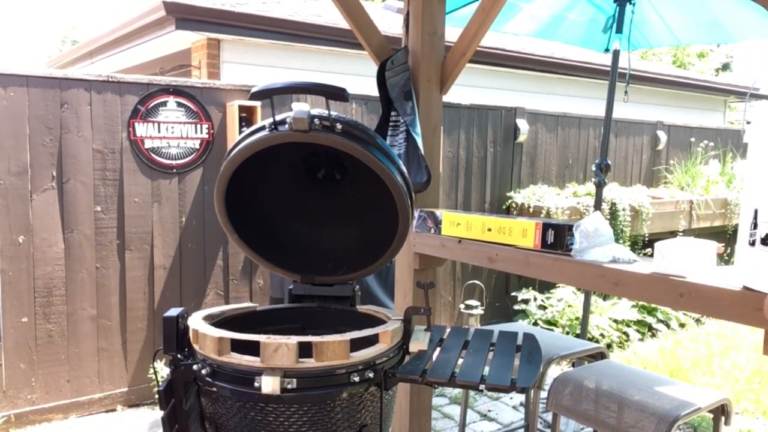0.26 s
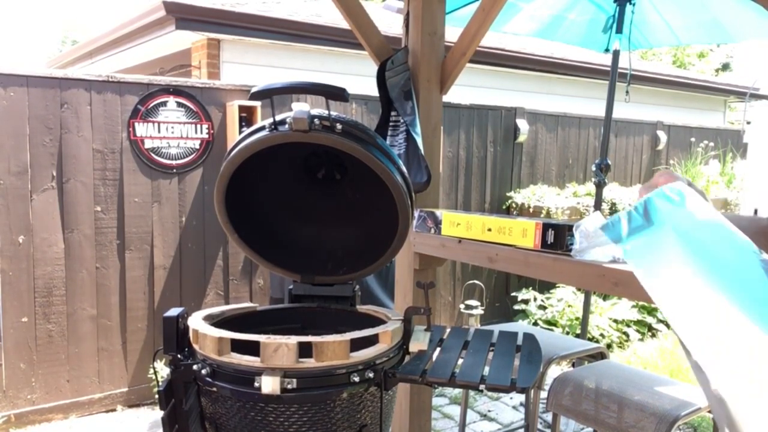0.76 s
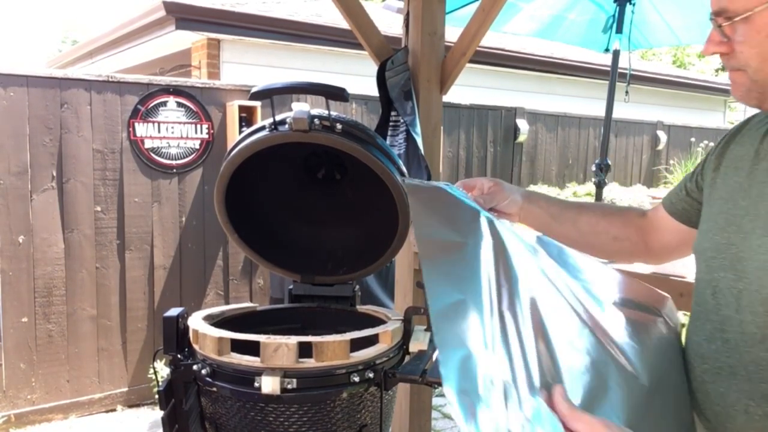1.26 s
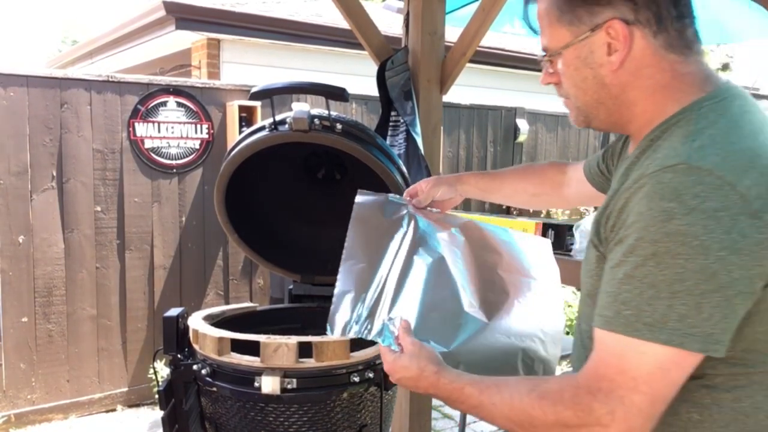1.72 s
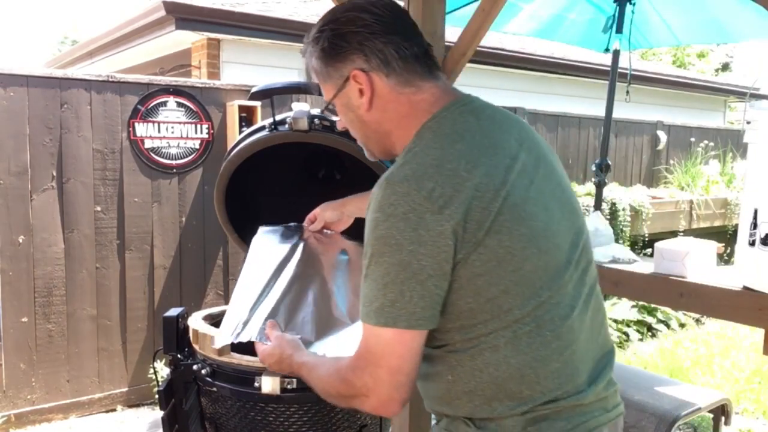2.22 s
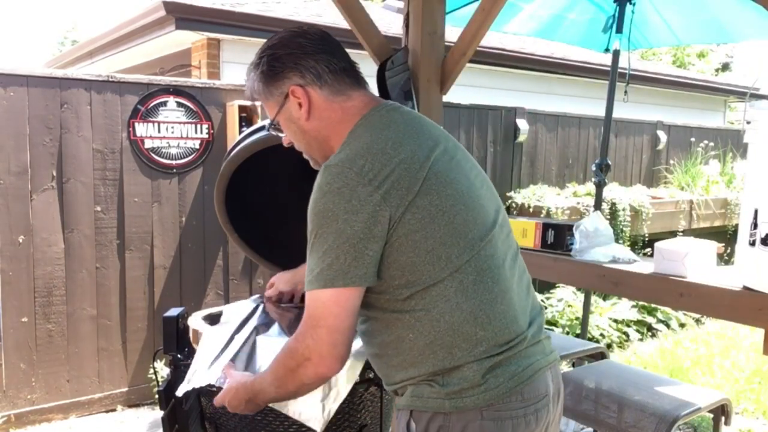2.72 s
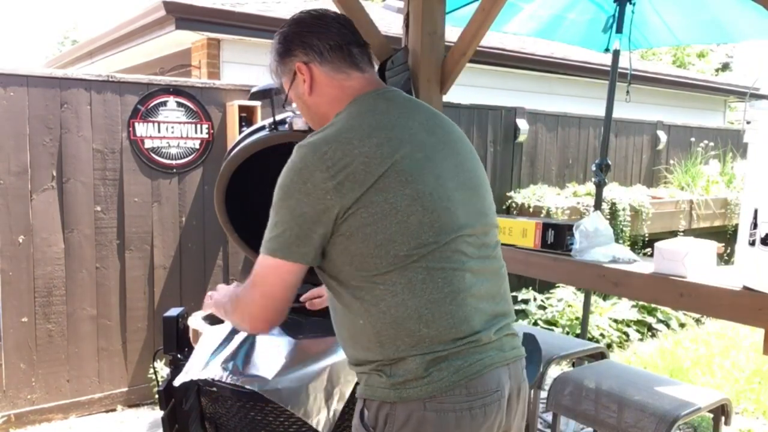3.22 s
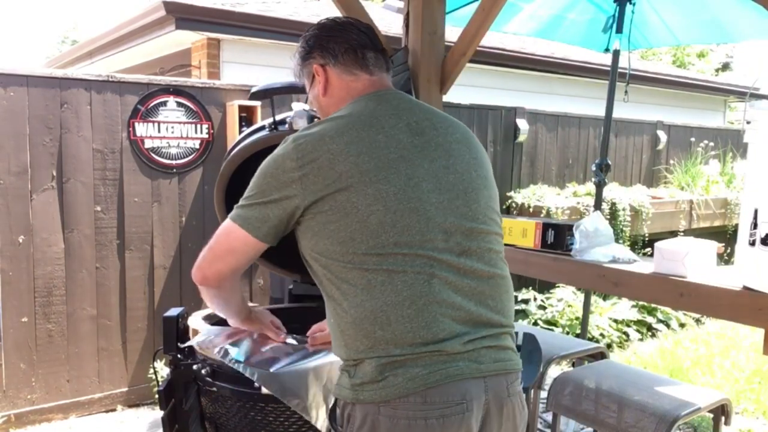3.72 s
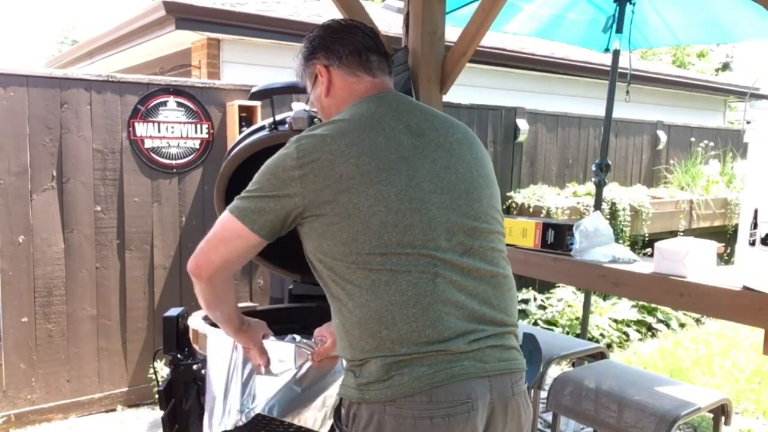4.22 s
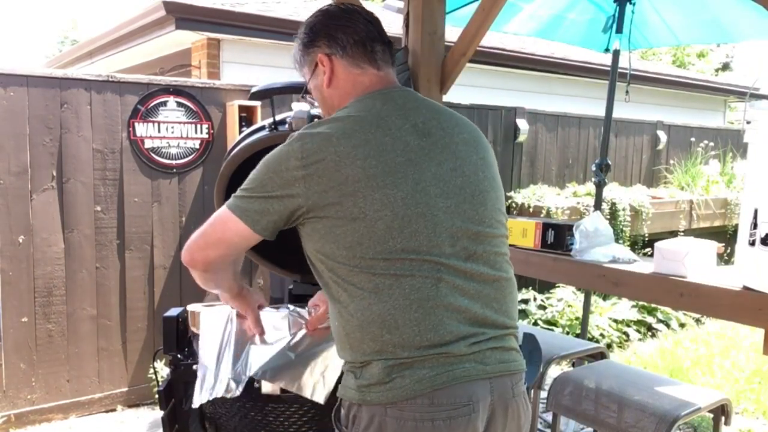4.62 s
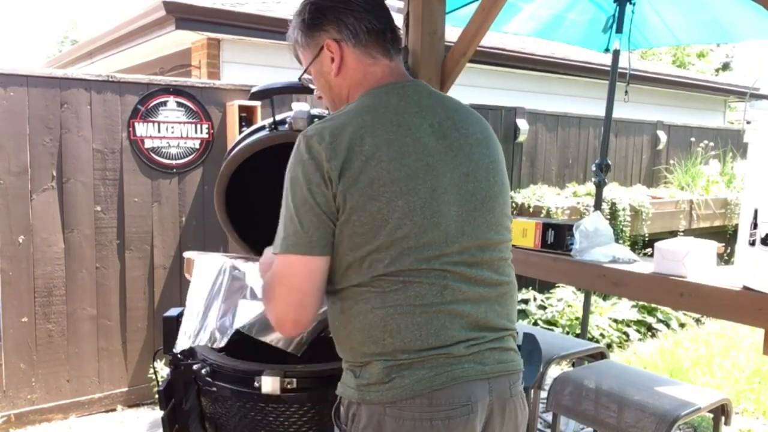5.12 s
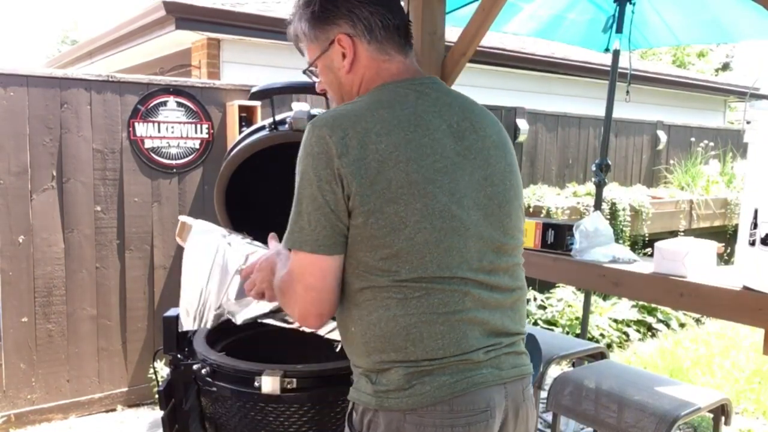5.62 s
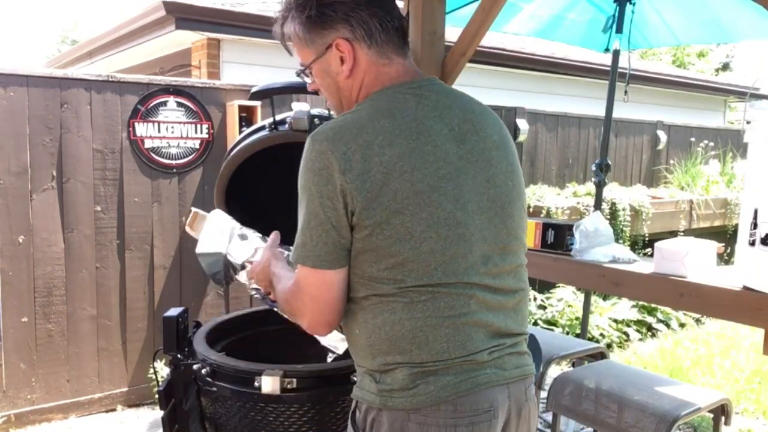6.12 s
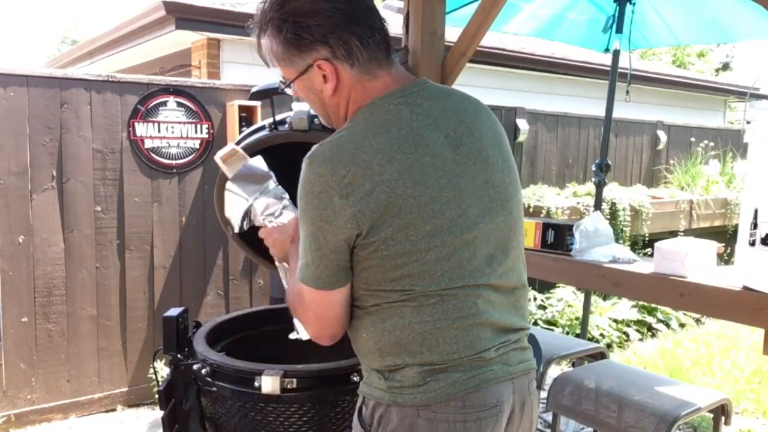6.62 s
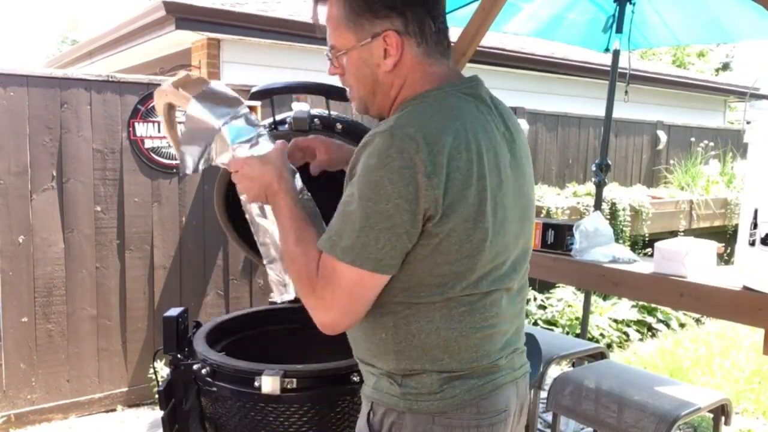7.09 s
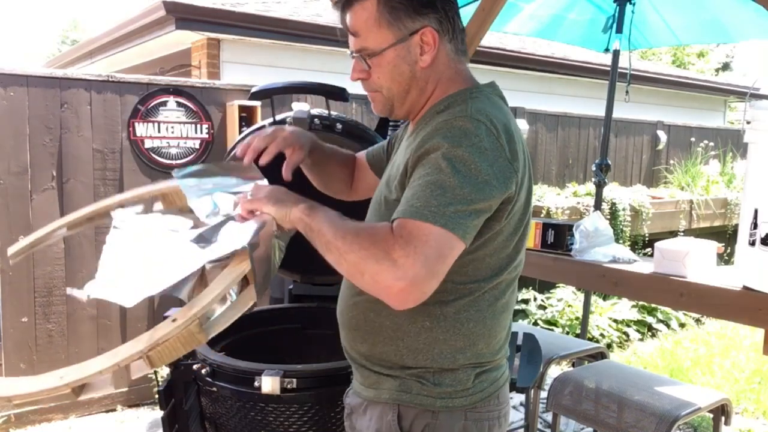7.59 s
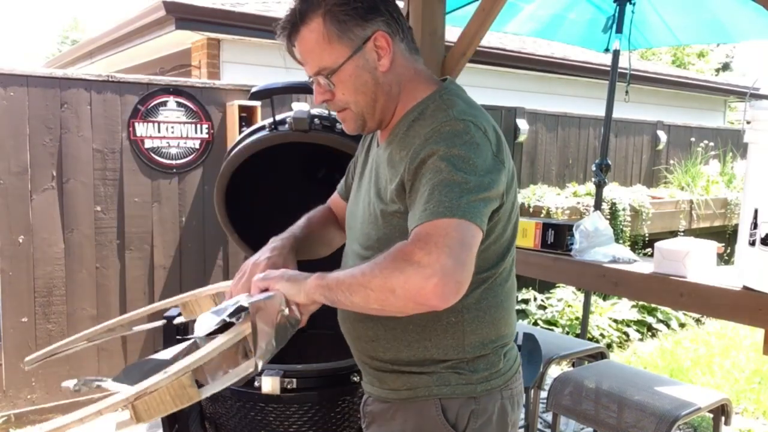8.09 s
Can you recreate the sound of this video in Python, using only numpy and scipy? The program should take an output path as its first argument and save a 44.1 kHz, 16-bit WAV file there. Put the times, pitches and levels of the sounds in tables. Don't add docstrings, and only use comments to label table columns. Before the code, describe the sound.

Foil tears harshly close by, rustles and snaps in handfuls against softly tapped wood, then crackles more quietly over faint traffic rumble.

```python
import sys
import numpy as np
from scipy import signal
from scipy.fft import rfft, irfft
from scipy.io import wavfile

SR = 44100
rng = np.random.default_rng(int(sys.argv[2]) if len(sys.argv) > 2 else 0)


def boost_factor(decibels):
    exponent = np.asarray(decibels, float) / 20
    return 10 ** exponent


def waveform_to_disk(signal):
    frames = np.transpose(np.atleast_2d(signal))
    scaled = np.clip(frames, -1, 1) * 32767
    samples = np.round(scaled).astype(np.int16)
    wavfile.write(sys.argv[1], SR, samples)


N = 368214


def rms_one(x):
    return x / np.sqrt(np.mean(x ** 2) + 1e-20)


def at_hz(points, hz):
    table = np.array(points)
    return np.interp(np.log(hz), np.log(table[:, 0]), table[:, 1])


def drift(rate_hz):
    r = np.exp(-32 * np.pi * rate_hz / SR)
    noise = rng.standard_normal(N // 16 + 3002)
    slow = signal.lfilter([1], [1, -2 * r, r * r], noise)[3000:]
    return np.interp(np.arange(N) / 16, np.arange(len(slow)), rms_one(slow))


def resonance(x, hz, width_hz):
    r = np.exp(-np.pi * width_hz / SR)
    poles = [1, -2 * r * np.cos(2 * np.pi * hz / SR), r * r]
    return signal.lfilter([(1 - r * r) / 2, 0, (r * r - 1) / 2], poles, x + 1e-18)


def gestures(rows, floor_db, dulls=0):
    s = np.arange(0, N + 64, 64) / SR
    peak_s, db, swell_s, fade_s, *tint = np.transpose(sorted(rows))
    after = np.searchsorted(peak_s, s)
    last, coming = np.maximum(after - 1, 0), np.minimum(after, len(db) - 1)
    fade = np.where(after > 0, fade_s[last], swell_s[0]).clip(.001)
    swell = np.where(after < len(db), swell_s[coming], fade_s[-1]).clip(.001)
    fading = db[last] - 10 * abs(s - peak_s[last]) / fade
    swelling = db[coming] - 10 * abs(s - peak_s[coming]) / swell
    level_db = np.maximum(np.maximum(fading, swelling), floor_db)
    lull_db = level_db - np.interp(s, peak_s, db)
    colour = np.interp(s, peak_s, sum(tint) + 0 * db) + dulls * lull_db
    return [np.interp(np.arange(N) / SR, s, curve) for curve in (level_db, colour)]


# (f/Hz, level/dB per Hz)
RUMBLE_COLOUR = [(18, -49), (30, -32), (61, 0), (144, -6), (182, -10), (237, -9.5), (307, -22), (350, -11),
                 (399, -40), (532, -28), (673, -32), (4090, -42), (15500, -70)]
# (f/Hz, width/Hz, level/dB)
MOTOR_LINES = [(74.4, 8, -53), (119.3, 13, -50.5), (235.6, 10, -55), (356.3, 10, -68)]
# (peak t/s, level/dB above the usual, swell t/s per 10 dB, fade t/s per 10 dB)
PASSES = [
    (.71, 5, .2, 3.1),
    (1.37, 4.5, 3.1, .155),
    (2.12, 4, .7, .06),
    (3.34, 3.5, 1.7, 1.1),
    (4.91, .5, 1.6, .53),
    (5.5, 4, .3, .3),
    (5.85, -1, .08, .35),
    (6.8, 5, .6, .4),
    (7.35, 8.5, .1, .07),
    (7.9, -.5, 3.1, .65),
]


def yard():
    rumble_db, lull_db = -45, -14
    hz = np.maximum(np.fft.rfftfreq(N, 1 / SR), 1)
    spectrum = rfft(rng.standard_normal(N)) * boost_factor(at_hz(RUMBLE_COLOUR, hz))
    rumble = rms_one(irfft(spectrum, N))
    motor = np.zeros(N)
    for line_hz, width_hz, db in MOTOR_LINES:
        motor += boost_factor(db) * rms_one(resonance(rng.standard_normal(N), line_hz, width_hz))
    swell_db = gestures(PASSES, lull_db)[0]
    swell = boost_factor(swell_db - np.median(swell_db))
    low_pass = signal.butter(2, 150, fs=SR, output="sos")
    deep = signal.sosfilt(low_pass, boost_factor(rumble_db - 8) * rumble + motor)
    return boost_factor(rumble_db - 2.5) * rumble + motor + (swell - 1) * deep


# (f/Hz, width/Hz, level/dB)
WOOD_TONES = [(185, 80, 2), (283.5, 72, 3.5), (360, 98, -5), (645, 40, -4.5)]
# (peak t/s, level/dB, swell t/s per 10 dB, fade t/s per 10 dB)
SHIFTS = [
    (.7, -41.5, .7, .43),
    (1.37, -48, 3.1, 1.1),
    (4.09, -34.5, .35, .4),
    (5.335, -41, .015, .2),
    (5.56, -33.5, .13, .036),
    (5.74, -35, 0.1, .07),
    (6.23, -42, .8, .3),
    (7.3, -51, 1.3, 3.1),
    (8.35, -41, .7, 2),
]


def wooden_ring():
    bumps = rng.standard_normal(N) * boost_factor(2 * drift(25))
    body = np.zeros(N)
    for hz, width_hz, db in WOOD_TONES:
        body += boost_factor(db) * resonance(resonance(bumps, hz, width_hz), hz, 2 * width_hz)
    level_db = gestures(SHIFTS, -54)[0]
    return boost_factor(level_db - 7.5) * rms_one(body)


# (t/s, peak level/dB, f/Hz)
TAPS = [(3.522, -36, 727), (3.601, -39, 993), (4.114, -33, 856), (4.186, -29, 703), (4.336, -35, 536),
        (4.435, -37, 942), (4.586, -34, 751), (5.327, -31, 606), (5.432, -35, 840), (5.56, -32, 603),
        (5.613, -39, 681), (5.728, -30, 606), (5.802, -30, 552), (5.925, -35, 778), (5.994, -33, 834),
        (6.229, -36, 719), (6.9, -40, 743), (7.254, -41, 659), (7.599, -45, 705), (8.148, -34, 732),
        (8.214, -34, 991)]


def taps():
    t60_s, rise_s, trim_db = .12, .004, -3
    out, s = np.zeros(N + SR), np.arange(SR // 5) / SR
    for start, peak_db, hz in TAPS:
        neighbour_hz = hz * rng.uniform(1.05, 1.3)
        pair = np.sin(2 * np.pi * hz * s) + .6 * np.sin(2 * np.pi * neighbour_hz * s)
        at = round(start * SR)
        out[at:at + len(s)] += pair * (1 - np.exp(-s / rise_s)) * boost_factor(peak_db + trim_db - 60 * s / t60_s)
    return out[:N]


# (f/Hz, t/s to fall by 60 dB)
RING_ON = [(300, 0.15), (1500, 0.44), (5000, 0.4), (15000, 0.126)]


def shimmer(x):
    s, tails = np.arange(SR // 2) / SR, 0
    for hz in 180 * 2. ** np.arange(7):
        band = signal.butter(1, [hz / np.sqrt(2), hz * np.sqrt(2)], "band", fs=SR, output="sos")
        noise = signal.sosfilt(band, rng.standard_normal((2, len(s))))
        tails = tails + noise * boost_factor(-60 * s / at_hz(RING_ON, hz))
    tails = tails * (1 - np.exp(-s / 0.0011))
    turn = 2.36 * drift(3.46)
    shares = x * np.array([np.cos(turn), np.sin(turn)])
    return signal.fftconvolve(shares, tails / np.linalg.norm(tails[0]), axes=1).sum(0)[:N]


# (t/s, peak level/dB, f/Hz, t/s to
# fall by 60 dB)
FOLDS = [(1.119, -10, 4150, 0.25), (1.361, -12, 5220, 0.2), (1.577, -21, 5410, 0.25),
         (2.037, -20, 3270, 0.13), (2.501, -20, 5140, 0.17), (2.901, -28, 2800, 0.15),
         (3.516, -24, 7430, 0.151), (3.6972, -20, 6620, 0.27), (3.7813, -19, 7110, 0.16),
         (3.838, -16, 5340, 0.11), (4.1835, -14, 3800, 0.084), (4.5048, -22, 2890, 0.11),
         (5.324, -18.5, 6950, 0.121), (5.4215, -16.5, 2760, 0.087), (5.4797, -18, 5540, 0.27),
         (6.0028, -14, 3130, 0.2), (6.228, -25, 6670, 0.25), (6.403, -25, 4300, 0.19),
         (6.5248, -27, 3770, 0.15), (6.772, -32, 1520, 0.14), (6.8847, -26, 6630, 0.19),
         (7.2361, -32, 3640, 0.15), (7.4368, -29.5, 2800, 0.12), (7.536, -40, 3260, 0.151),
         (7.7624, -29.5, 5220, 0.151), (7.863, -29, 2760, 0.13), (7.9157, -26, 4870, 0.12),
         (7.9919, -34.5, 3710, 0.15), (8.042, -25.5, 5000, 0.151), (8.148, -22, 1840, 0.161),
         (1.5193, -19.5, 4610, 0.12), (1.871, -33, 3980, 0.11), (4.3296, -19.5, 1800, 0.11),
               (4.5799, -21, 3280, 0.12), (4.689, -20, 2720, 0.084), (4.7796, -25, 6860, 0.12),
               (5.797, -18, 4810, 0.11), (7.0444, -29, 1500, 0.098), (7.6188, -24.5, 6480, 0.13),
               (8.3195, -20, 1900, 0.13), (3.4892, -36.5, 2550, 0.13), (5.0388, -37, 2600, 0.15),
               (5.1793, -41, 2940, 0.151), (5.2911, -35, 3650, 0.17), (7.1783, -44, 4560, 0.15),
               (7.3763, -37.5, 3080, 0.15), (2.728, -20, 4000, 0.13)]
# (t/s, peak level/dB, f/Hz)
LESSER_CREASES = [(0.179, -3, 5770), (0.3294, -1, 8320), (0.9644, -12, 3750), (1.0104, -10, 4140),
                  (1.0494, -9, 5470), (1.1794, -7, 5380), (1.3044, -11, 3840), (1.4904, -17, 2720),
                  (1.9964, -21, 3020), (2.3174, -25, 4010), (2.5734, -14, 5690), (3.5264, -10, 4340),
                  (4.8654, -26, 2770), (5.3884, -18, 3790), (5.6484, -21, 3930), (6.3674, -21, 2850),
                  (6.8917, -19, 6610), (6.9294, -19, 11900), (7.2524, -24, 3670), (7.4104, -30, 3890),
                  (7.5634, -24, 5140), (7.8925, -26, 2650), (8.0234, -16, 2640), (8.2784, -18, 4260)]


def folds():
    out, s = np.zeros(N + SR), np.arange(SR // 6) / SR
    lesser = [(start, db - 7, hz, .09) for start, db, hz in LESSER_CREASES]
    for start, peak_db, hz, t60_s in FOLDS + lesser:
        sizes_db = 3.2 * np.minimum(rng.exponential(1, len(s)), 4)
        clicks = rng.standard_normal(len(s)) * boost_factor(sizes_db)
        clicks = signal.lfilter([1, -.5], [1], clicks)
        shower = clicks + 1.8 * resonance(clicks, hz, hz)
        shower = shower + 1.2 * resonance(shower_source(clicks, hz), hz, .25 * hz)
        at = round(start * SR)
        dying = boost_factor(peak_db - 5.0 - 60 * s / t60_s) * (1 - np.exp(-s / .003))
        out[at:at + len(s)] += rms_one(shower) * dying
    return out[:N]


def creases(curves, spectrum, low_hz, per_s, spread_db, clump_db, patchy_db, sharpness):
    level_db, top_db, boom_db, slack_db = curves
    n = len(level_db)
    sizes = boost_factor(spread_db * np.minimum(rng.exponential(1, n), 5)) * rng.choice([-1, 1], n)
    clicks = sizes * (rng.random(n) < per_s * boost_factor(clump_db * drift(90)[:n]) / SR)
    dealt = rng.integers(0, 4, n)
    spells = [drift(12.1)[:n] for _ in range(3)]
    top_db, boom_db = top_db - np.median(top_db), boom_db - np.median(boom_db)
    out, steady = np.zeros(n), np.zeros(n)
    for k, hz in enumerate(np.geomspace(low_hz, 16000, 22)):
        tilt = np.interp(np.log2(hz / 3300), [-2.2, -.6, .6, 1.7, 2.3], [-1, 0, 0, 1, 1.35])
        facet = rms_one(resonance(clicks * (dealt == k % 4), hz, hz / sharpness))
        facet *= boost_factor(at_hz(spectrum, hz)) * np.sqrt(hz)
        wide = np.exp(-(np.log2(hz / 1600) / .5) ** 2)
        steady += facet * (tilt == 0)
        change_db = max(tilt, 0) * top_db + max(-tilt, 0) * boom_db
        change_db = change_db + wide * slack_db + patchy_db * spells[k // 2 % 3]
        out += facet * boost_factor(change_db) * (-1) ** (k // 4)
    return boost_factor(level_db) * out / np.std(steady)


# (f/Hz, level/dB per Hz)
FOIL_COLOUR = [(240, -41), (400, -11.5), (459, -20.5), (624, -1.5), (943, -14.5), (1260, 0), (2190, -7),
               (2930, 0.5), (4930, -3.5), (6590, -2.5), (9230, -6), (9960, -8), (12500, -3), (15500, -18)]


def pings(level_db, per_s, cycles, spread_db):
    at = np.flatnonzero(rng.random(N) < per_s / SR)
    pitch, size = rng.random((2, len(at), 1))
    hz, i = 2200 * (14000 / 2200) ** pitch, np.arange(360)
    decay_db = -60 * i * hz / SR / cycles
    rings = np.sin(2 * np.pi * hz * i / SR) * boost_factor(decay_db - spread_db * np.log(size + 0.031))
    out = np.zeros(N + len(i))
    np.add.at(out, at[:, None] + i, rings * boost_factor(at_hz(FOIL_COLOUR, hz)) * np.sqrt(hz / 3000))
    return boost_factor(level_db) * rms_one(out[:N])


# (peak t/s, crinkle level/dB, swell t/s per 10 dB, fade t/s per 10 dB, brightness level/dB)
CARRYING = [(0.0, -33, .02, .037, -2), (0.046, -34.5, .033, .2, -4.5), (0.52, -29.5, .014, .9, 5),
            (0.652, -27.5, .17, 1.6, 0), (0.89, -29, .9, .04, -3), (1.066, -22, .155, .08, 2),
            (1.211, -21.5, .11, .17, 2), (1.633, -31, .7, .14, -2), (1.95, -34, .3, .4, -3.5),
            (2.045, -29.5, .029, .06, 1.5), (2.11, -38, .1, 1.5, -6), (2.503, -30, .17, .125, -0.5),
            (2.593, -28.5, .073, .127, 2), (2.733, -27.5, .25, .143, 3.5), (2.917, -34, .16, .068, -1.5),
            (3.03, -50.5, 5, .17, -18), (3.2, -62, .1, 1.2, -10), (3.34, -59, .15, .15, -12)]
PRESSING = [(3.489, -44, .004, .9, -8), (3.539, -25, .027, 0.09, 2.5), (3.628, -27, .026, .075, 3.5),
            (3.722, -28, 0.03, 0.12, 4.5), (3.88, -27.5, .11, .55, 3), (4.243, -34, .3, .4, 1),
            (4.647, -33.5, .26, .23, 3), (4.785, -37, .09, .17, -1), (4.95, -46, .1, .052, -4.5),
            (5.047, -46, .04, .23, -2), (5.127, -51, .1, .03, -12), (5.191, -49.5, .025, .025, -8),
            (5.22, -57, .1, .4, -10), (5.293, -52, .003, .9, -6), (5.331, -27.5, .016, .046, 1),
            (5.433, -29, .068, .045, 3), (5.505, -31.5, .06, 1.5, 5.5), (5.572, -31.5, .9, .05, 2),
            (5.811, -30, .27, .25, 1.5), (5.99, -29.5, .22, .25, 3), (6.175, -34, 1.2, .07, 6),
            (6.253, -32.5, .077, .136, 3.5), (6.587, -39, 3.1, .15, -3.5), (6.777, -43, .034, .107, -4)]
TURNING = [(6.883, -41, .003, .9, -3), (6.899, -36, .03, .9, 2), (6.959, -34, .3, .078, 1.5),
           (7.107, -38, .099, 0.07, -0.5), (7.228, -49.5, .33, .3, -3), (7.257, -38, .027, .075, -1),
           (7.377, -43, .003, .9, -6), (7.435, -42, .3, .05, -2), (7.49, -47.5, .9, .09, -12),
           (7.536, -42, .006, .9, -4), (7.642, -37.5, .3, .13, -0.5), (7.763, -39, .004, .9, -5),
           (7.791, -36.5, .075, .1, -1), (7.931, -41, .16, .09, 2), (8.04, -36.5, .08, .1, 0),
           (8.057, -30, .02, .17, 2.5), (8.171, -31.5, .13, .14, -1.5), (8.323, -32, .195, .09, -0.5)]
# (t/s, boom minus crinkle level/dB)
BEARING = [(.1, -10), (.7, -15), (1.0, -19.5), (1.55, -22), (2.1, -19), (2.8, -23), (3.15, -8), (3.6, -16),
           (4.0, -8), (4.7, -11.5), (5.17, -18), (5.5, -7), (6.05, -13), (6.4, -10), (6.75, -14),
           (6.95, -11), (7.8, -18), (8.15, -8)]
# (t/s, level/dB)
SLACK = [(1.16, -1), (1.42, 1.5), (1.78, 3.5), (1.86, 0), (1.95, 1.5), (3.1, 0), (3.33, 3), (3.8, -2),
         (4.55, 1.5), (5.3, 1), (5.65, -3), (6.07, -2), (6.42, 2.5), (6.6, -1), (6.85, 1), (7.15, -6),
         (7.25, 1), (7.9, 0)]


def handling():
    s = np.arange(N) / SR
    level_db, top_db = gestures(CARRYING + PRESSING + TURNING, -80, .35)
    boom_db = np.interp(s, *np.transpose(BEARING)) + (.7 - 1) * (level_db + 35) + 1.2 * drift(8.4)
    slack_db = np.interp(s, *np.transpose(SLACK))
    free = (s < .166) | (s > .55)
    rustle = creases((level_db, top_db, boom_db, slack_db), FOIL_COLOUR, 411, per_s=11000,
                     spread_db=1.0, clump_db=1.5, patchy_db=1.5, sharpness=4.16)
    pops = pings(level_db - 11, per_s=400, cycles=18, spread_db=2.5)
    return free * (rustle + pops)


# (f/Hz, level/dB per Hz)
RIP_COLOUR = [(53, -48), (90, -12), (136, -5), (253, -4), (407, -10), (587, -8), (728, -3), (1100, -12),
              (1620, -3), (2300, -3.5), (6200, -1.5), (12300, -3), (15500, 0.5)]
# (peak t/s, rip level/dB, swell t/s per 10 dB, fade t/s per 10 dB, rattle level/dB)
PULLS = [
    (0.170, -30, .004, .3, -6),
    (0.186, -22, .04, .047, -8),
    (0.216, -17.5, .008, .3, -8),
    (0.226, -11.5, .033, .1, -8),
    (0.297, -17, .08, .05, -12),
    (0.375, -14, .11, .5, -8),
    (0.432, -14.5, .2, .4, -8),
    (0.479, -13.5, .3, .017, -5),
    (0.512, -27.5, -3, .1, -10),
]
# (t/s, peak level/dB, main tone f/Hz, weaker second tone f/Hz)
KNOCKS = [(0.168, -20, 209, 791), (0.202, -12, 218, 452), (0.219, -9.5, 266, 670), (0.229, -14, 230, 640),
          (0.256, -12, 230, 670), (0.288, -12, 157.6, 450), (0.357, -13, 290, 400), (0.377, -7, 270, 450),
          (0.392, -4, 260, 723), (0.405, 0, 400, 290), (0.417, -4, 440, 740), (0.426, -6, 470, 720),
          (0.443, -4, 860, 340), (0.476, -3, 215, 730), (0.472, -4, 700, 780), (0.495, -12, 223, 584),
          (0.362, -8, 150, 112), (0.476, -10, 118, 300)]


def tear():
    first, last = round(.168 * SR), round(.56 * SR)
    level_db, rattle_db = [curve[first:last] for curve in gestures(PULLS, -90)]
    out, s = np.zeros(N), np.arange(SR // 4) / SR
    out[first:last] = creases((level_db, 0 * level_db, rattle_db, 0), RIP_COLOUR, 124.5, per_s=11000,
                              spread_db=3.5, clump_db=1.6, patchy_db=1.0, sharpness=2.6)
    high_db, t60_s = -4.5, .07
    for start, peak_db, low_hz, high_hz in KNOCKS:
        tones = np.sin(2 * np.pi * low_hz * s) + boost_factor(high_db) * np.sin(2 * np.pi * high_hz * s)
        at = round(start * SR)
        out[at:at + len(s)] += tones * (1 - np.exp(-s / 0.0019)) * boost_factor(peak_db - 6.5 - 60 * s / t60_s)
    return out


def shower_source(clicks, hz):
    return clicks


def scene():
    foil = boost_factor(-1.5) * (tear() + handling()) + folds()
    hiss = boost_factor(-71) * rng.standard_normal(N)
    mono = foil + boost_factor(-13.0) * shimmer(foil) + wooden_ring() + yard() + taps() + hiss
    return np.array([mono, mono])


# (start t/s, low f/Hz, high f/Hz)
SPLITS = [(.331, 6850, 8350), (.331, 9630, 11100), (.633, 6210, 7670), (.815, 14430, 15900),
          (1.144, 5620, 6920), (1.144, 7520, 9700), (1.887, 8190, 10330), (1.887, 10980, 12420),
          (2.188, 6240, 8290), (2.21, 12490, 15200), (7.298, 4570, 6350), (7.298, 6880, 8340),
          (7.298, 10350, 11770), (7.298, 14790, 15900)]


def split_bands(x):
    out, size = x.copy(), 2048
    window, hz = np.hanning(size), np.fft.rfftfreq(size, 1 / SR)
    for start, low_hz, high_hz in SPLITS:
        at = round(start * SR)
        band = rfft(x[0, at:at + size]) * ((hz > low_hz) & (hz < high_hz))
        other = irfft(band * np.exp(2j * np.pi * rng.random(len(hz))), size)
        less = (np.sqrt(.5) - 1) * irfft(band, size)
        out[:, at:at + size] += window * (less + np.sqrt(.5) * other * [[1], [-1]])
    return out


def roll_off(x):
    return signal.sosfilt(signal.butter(12, 15680, fs=SR, output="sos"), x)


# (f/Hz, width/Hz, depth 0-1)
TREBLE_DIPS = [(7420, 410, 0.27), (10120, 560, 0.3), (15500, 1900, 0.34)]


def record(dry):
    heard = signal.sosfilt(signal.butter(3, 42, "high", fs=SR, output="sos"), dry)
    for hz, width_hz, depth in TREBLE_DIPS:
        heard = heard - depth * resonance(heard, hz, width_hz)
    overloaded = np.clip(heard, -.99, .99)
    cut = signal.sosfilt(signal.cheby2(20, 60, 16200, fs=SR, output="sos"), overloaded)
    mix = np.clip(split_bands(cut), -1, 1)
    return roll_off(mix)


dry = scene()
out = record(dry)
waveform_to_disk(out)
```